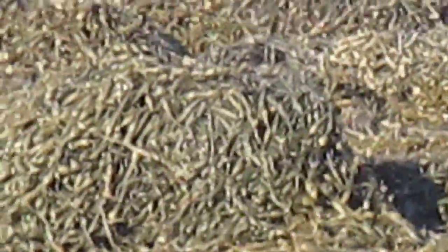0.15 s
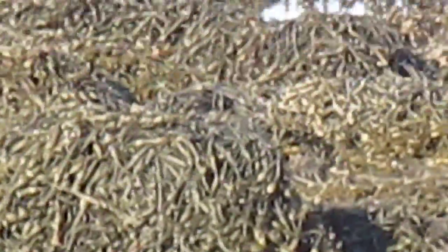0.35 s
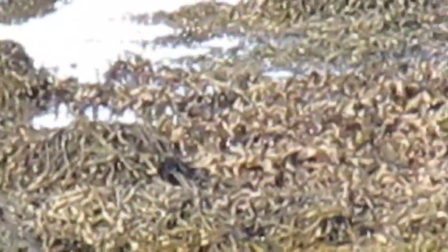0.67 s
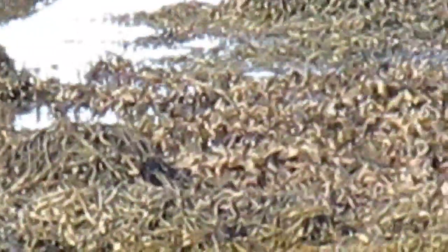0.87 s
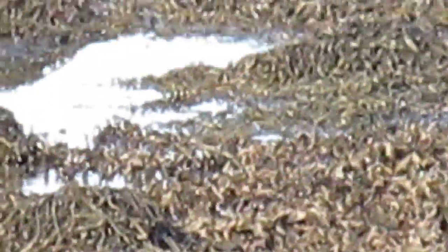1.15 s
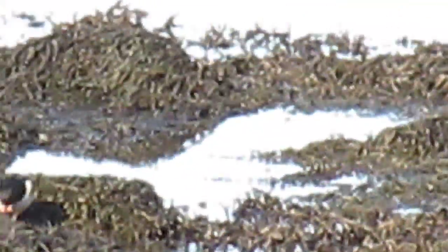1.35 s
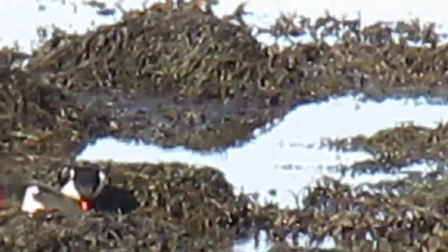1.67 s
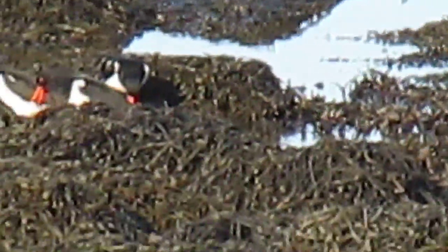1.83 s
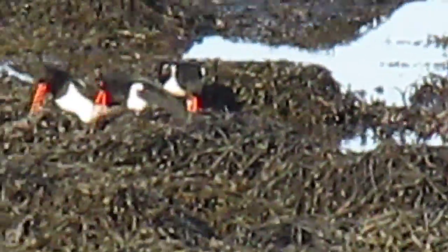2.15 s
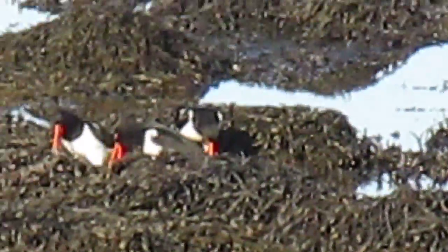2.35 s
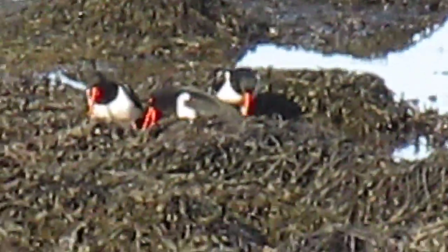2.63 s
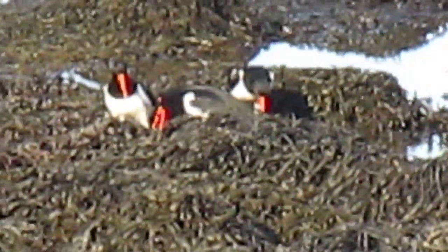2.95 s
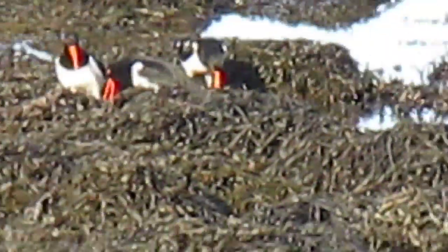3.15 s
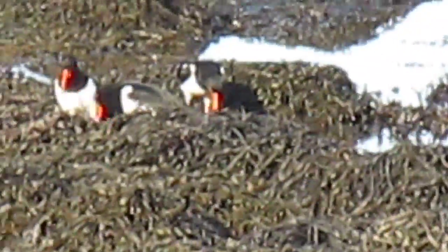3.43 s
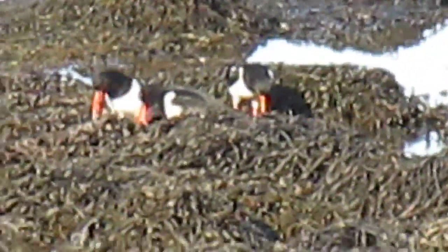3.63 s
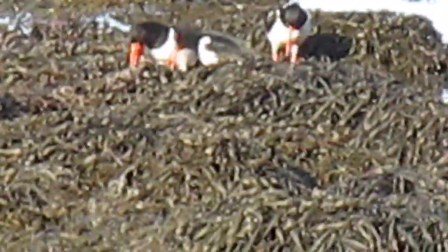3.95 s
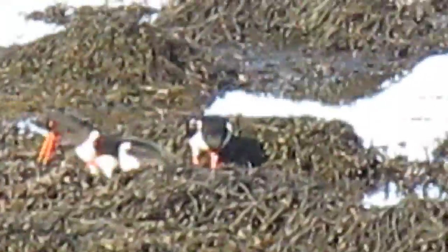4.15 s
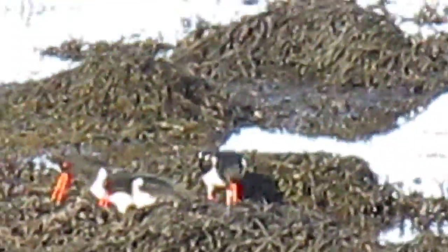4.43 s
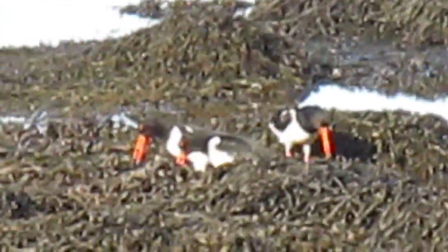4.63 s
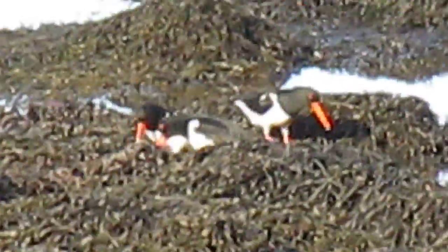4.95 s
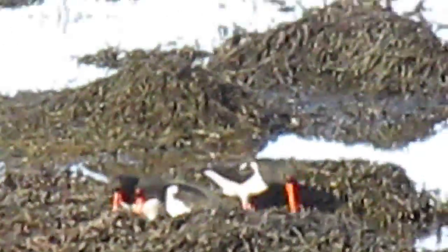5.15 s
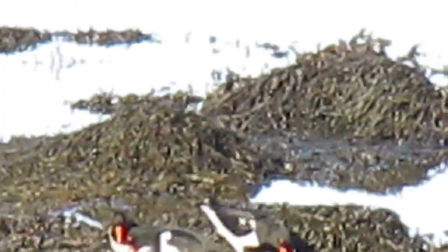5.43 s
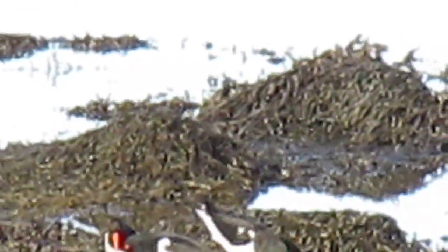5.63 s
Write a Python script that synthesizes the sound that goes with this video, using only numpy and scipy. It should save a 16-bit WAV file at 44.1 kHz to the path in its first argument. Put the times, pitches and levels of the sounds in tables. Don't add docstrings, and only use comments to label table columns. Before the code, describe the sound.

Outdoor handheld stereo pickup on a seaweed-covered shore. Fast, piercing bird whistles tumble over one another, the highest in paired syllables, others lower with slurs and upward flicks. After about four seconds the highest voice drops out for a while and soft deep whistles fill in. Low wind buffeting grows, with dull thumps, clicks of the camera shell and short dry rubbing over a soft distant surf hiss.

```python
import sys
import numpy as np
from scipy import signal
from scipy.fft import rfft, irfft, next_fast_len
from scipy.io import wavfile

SR = 44100
rng = np.random.default_rng(int(sys.argv[2]) if len(sys.argv) > 2 else 0)


def store_wav(level_fs):
    pcm = np.round(np.clip(np.atleast_2d(level_fs), -1, 1) * 32767)
    wavfile.write(sys.argv[1], SR, pcm.T.astype(np.int16))


def voltage_ratio(decibels):
    exponent = np.asarray(decibels, float) / 20
    return 10 ** exponent


N = 255339

# middle in seconds, left level in dB, right level in dB, hold in seconds.
GUSTS = [(.0, -38.5, -33, 0.026), (.28, -45.5, -47, 0.041), (0.484, -32.5, -23.5, 0.021),
         (.72, -50.5, -47, .2), (1.441, -35.5, -27, 0.026), (1.6, -39.5, -32, 0.096),
         (1.79, -30, -24, 0.075), (1.94, -39.5, -35, 0.09), (2.259, -31.5, -36.5, 0.0096),
         (3.08, -43, -35, 0.19), (3.24, -35.5, -32, 0.016), (3.431, -41.5, -34, 0.14),
         (3.68, -36, -26.5, 0.057), (3.88, -34.5, -28.5, 0.024), (4.059, -27.5, -19.5, 0.0049),
         (4.251, -33.5, -26, 0.021), (4.672, -27.5, -19, 0.34), (5.154, -31, -26, 0.039),
         (5.288, -21, -26, 0.025), (5.424, -25.5, -19.5, 0.012), (5.658, -22, -17, 0.023),
         (5.77, -33.5, -26.5, 0.032)]
# frequency in Hz, level in dB.
SURF_SPECTRUM = [(150, 7), (300, 0), (700, -9.5), (1600, -9.5), (2550, -9.5), (3400, -17), (9400, -19.5),
                 (16000, -24)]
# frequency in Hz, likeness from -1 to 1.
SURF_LIKENESS = [(150, -0.19), (600, -0.32), (1500, 0.34), (4000, 0.28), (15000, 0.26)]

# frequency in Hz, gain in dB.
THROAT = [(1200, -5), (2000, -2.5), (2550, 2.5), (3050, 3), (3600, 1.5), (5500, -2.5), (9000, 9),
          (14000, -13.5)]
# time in seconds, then highest, bright, middle and lowest bird in dB.
FACING = [
    (0.0, 0, -1, 4, -1.5),
    (1.2, 8.5, 4.5, 9, 5),
    (2.0, -2, -2.5, 5, 4),
    (3.0, 3.5, 3.5, 4.5, -0.5),
    (3.8, 2, -2.5, 1.5, 0),
    (5.79, 3.8, -5, -14, -7.5),
]
MIDDLE_OVERTONES_DB = [-3, -8, -24, -37, -37]
HIGH_OVERTONES_DB = [1.5, -5, -23.5, -17.5, -22]
SHARP_OVERTONES_DB = [-2.5, 0.5, -9.5, -13.5, -11.5]
LOW_OVERTONES_DB = [4, 4, -8, -18.5, -35, -25]
DEEP_OVERTONES_DB = [1, -1, -6.5, -39, -17]

MIDDLE_NOTES = [(.018, 2190, -55.5, 0.084), (.472, 2270, -56, 0.024), (1.462, 2190, -58, 0.035),
                (2.08, 2286, -54, 0.048), (2.235, 2250, -53, 0.031), (2.38, 2245, -53, 0.038),
                (2.53, 2360, -49, 0.03), (2.672, 2270, -55.5, .034), (4.565, 2050, -50.5, 0.03),
                (4.721, 2000, -51, 0.027), (4.61, 2050, -66, 0.038)]
MIDDLE_RUN = [(2.852, 1984, -54, 0.031), (3.037, 1950, -54, 0.033), (3.237, 2020, -54, .034),
              (3.35, 2000, -52.5, 0.031), (3.473, 2066, -53, 0.033), (3.593, 2000, -56.5, 0.051),
              (3.724, 2044, -55.5, 0.046), (3.855, 2063, -53.5, 0.041), (3.996, 2025, -53, 0.035),
              (4.136, 2000, -53.5, 0.042), (4.277, 1953, -54, 0.039), (4.42, 1940, -50, 0.034)]
MIDDLE_PEAKS = [(.25, 2450, -56.5, 0.024), (.447, 2290, -55, .028), (.577, 2277, -53.5, 0.04),
                (.918, 2420, -52, 0.031), (1.091, 2380, -54, 0.032), (1.259, 2420, -49.5, 0.034),
                (1.41, 2440, -54, .03), (1.578, 2400, -50.5, 0.028)]
HIGH_FIRST = [(.22, 2880, -43.5, 0.038), (.487, 2866, -44.5, 0.041), (.765, 3000, -44.5, 0.047),
              (.934, 3093, -40.5, 0.05), (1.203, 2814, -44, 0.043), (1.435, 2987, -43, 0.056),
              (1.694, 2863, -39.5, 0.048), (1.928, 2823, -37.5, 0.044), (2.105, 2730, -39.5, 0.032),
              (2.14, 2747, -37, 0.033), (2.363, 2776, -39.5, 0.035), (2.576, 2786, -39, 0.041),
              (2.825, 2630, -39.5, .036), (3.075, 2830, -41, 0.046), (3.316, 2755, -39, 0.039),
              (3.594, 2765, -36, 0.043), (3.883, 2697, -40, 0.038), (4.158, 2723, -41, .034),
              (5.659, 2690, -49, .045)]
HIGH_SECOND = [(.098, 3245, -40, 0.1), (.387, 3227, -42.5, 0.07), (.664, 3210, -42.5, 0.077),
               (1.01, 3224, -36, 0.039), (1.261, 3300, -39.5, 0.05), (1.523, 3176, -40.5, 0.049),
               (1.776, 3100, -38, 0.046), (1.985, 3050, -35, 0.043), (2.187, 3060, -37.5, 0.04),
               (2.403, 3043, -38.5, 0.054), (2.642, 2856, -38.5, 0.044), (2.885, 2955, -40.5, 0.053),
               (3.123, 2954, -40, 0.048), (3.38, 2705, -36.5, 0.048), (3.648, 2720, -38, 0.05),
               (2.815, 3150, -51, .022), (3.207, 3030, -56, .02), (3.412, 3100, -55, 0.019),
               (.632, 3180, -56, 0.016), (5.009, 2656, -42, 0.048), (5.26, 2895, -43.5, 0.041),
               (5.458, 2675, -43, 0.037), (5.706, 2670, -49, .055)]
SHARP_PIPS = [(.114, 2490, -57, 0.045), (.321, 2615, -50, 0.042), (.603, 2538, -48.5, 0.027),
              (.718, 2487, -47.5, 0.019), (.802, 2580, -45.5, 0.0087), (.966, 2580, -48, 0.041),
              (1.299, 2550, -47.5, 0.026), (1.441, 2550, -44, 0.027), (2.682, 2430, -48.5, 0.028),
              (2.855, 2485, -46.5, 0.038), (3.43, 2424, -45.5, 0.031), (4.43, 2427, -44, 0.03),
              (5.2, 2250, -50, 0.023), (5.635, 2350, -50.5, .024)]
SHARP_ARCHES = [(1.127, 2630, -45.5, 0.038), (1.624, 2517, -43.5, 0.031), (1.778, 2510, -45, 0.026),
                (3.051, 2403, -46, 0.043), (3.247, 2472, -42, 0.03), (3.83, 2570, -54, 0.022),
                (3.951, 2557, -40.5, 0.047), (4.532, 2365, -49.5, .045), (4.688, 2326, -45.5, 0.033),
                (4.779, 2293, -48.5, 0.037), (4.244, 2440, -47.5, 0.057), (4.964, 2586, -42, 0.038),
                (5.234, 2490, -44, 0.041), (5.43, 2424, -41, 0.033)]
LOW_SLURS = [
    (.267, 2174, -56, .128),
    (.503, 1966, -52, 0.1),
    (4.998, 1755, -50, 0.049),
]
LOW_TRILL = [(.15, 1820, -59, 0.018), (.632, 1490, -53, .025), (.76, 1963, -49, 0.051),
             (.968, 1730, -47, 0.014), (1.207, 1897, -50.5, 0.042), (1.423, 1951, -48, 0.022),
             (2.772, 1780, -47, 0.014), (2.959, 1795, -50, 0.021), (3.139, 1826, -43.5, 0.011),
             (4.875, 1763, -53.5, 0.033), (5.136, 1813, -52.5, 0.031), (5.253, 1900, -63, 0.026),
             (5.284, 1900, -48.5, 0.03), (5.45, 1760, -44.5, .025), (5.751, 1980, -50.5, 0.029)]
LOW_FLICKS = [(1.045, 1679, -45, 0.032), (1.586, 1748, -48, 0.027), (1.728, 1757, -46, 0.034),
              (1.878, 1768, -47.5, 0.039), (2.045, 1794, -46, 0.03), (2.209, 1790, -47, 0.021),
              (2.349, 1728, -42.5, 0.02), (2.496, 1684, -45.5, 0.026), (2.642, 1720, -45, 0.032)]
FAR_NOTES = [(3.593, 1550, -52, .04), (3.745, 1586, -57.5, 0.031), (4.12, 1710, -55.5, .03),
             (4.378, 1555, -56, .03), (4.508, 1420, -59, 0.027), (4.534, 1520, -56, .03),
             (4.662, 1595, -60, 0.036), (4.695, 1446, -53, 0.027), (4.783, 1486, -57.5, .025),
             (4.85, 1440, -52.5, 0.024), (4.912, 1500, -63, 0.018), (5.113, 1405, -54, 0.022),
             (5.19, 1540, -70, 0.027), (5.345, 1560, -66, 0.037), (5.402, 1520, -50.5, 0.032),
             (5.472, 1510, -58, 0.027), (5.566, 1342, -53.5, .035), (5.612, 1550, -51, 0.028),
             (5.697, 1470, -56, 0.016), (5.717, 1473, -53.5, 0.036), (5.79, 1520, -60, 0.019)]

# time in seconds, peak in dB, brightness in dB.
TICKS = [(0.04, -44, -10), (0.301, -41, -11), (0.685, -38, 9), (0.838, -42, -7), (1.162, -36.5, 5),
         (1.217, -35.5, -15), (1.321, -36.5, -5), (1.908, -38, 26), (4.05, -34, -3), (4.206, -30, 23.5),
         (4.357, -28, 23), (4.408, -32, 32), (5.388, -30.5, -4), (5.423, -25.5, 13), (5.436, -28.5, 8),
         (5.563, -32, -25)]
# frequency in Hz, level in dB, 60 dB decay in seconds.
SHELL_MODES = [(990, 7.5, 0.035), (1320, 20, 0.0049), (2000, 5.5, 0.0094), (3000, 4.5, 0.0062),
               (3665, -6.5, 0.014), (5900, -16, 0.0098)]
# frequency in Hz, level difference in dB.
PORT_BALANCE = [(300, 0), (1290, -1.5), (2380, -5), (4400, -3), (8120, 4.5), (15000, -3)]
# frequency in Hz, phase in radians.
PORT_PHASE = [(1000, 0.093), (2330, 1.1), (3450, -0.015), (5080, 1.61), (7060, 0.47), (7670, -1.16),
              (10200, -0.23), (16000, 0.31)]
# time in seconds, peak in dB.
THUMPS = [
    (0.475, -32),
    (1.779, -30),
    (3.662, -25),
    (4.046, -27),
    (4.638, -19.5),
    (4.861, -21.5),
]
# time in seconds, level in dB.
HUM = [
    (1.85, -85),
    (1.95, -62.5),
    (2.3, -71),
    (2.45, -61),
    (2.65, -66),
    (2.9, -75),
]
# time in seconds, level in dB.
RUSTLE = [
    (2.45, -92),
    (2.55, -57),
    (2.66, -63),
    (2.74, -93),
]
# time in seconds, level in dB.
RUB = [
    (5.37, -96),
    (5.385, -46.5),
    (5.41, -59.5),
    (5.44, -68),
    (5.54, -87),
    (5.57, -54),
    (5.62, -44),
    (5.64, -99),
]

# climb in seconds, climb gained per second of length,
# share of pitch lost in the fall, more lost per second of fall.
MIDDLE_SHAPE, RUN_SHAPE = (.002, .45, .15, 5.5), (.002, .6, .12, 5.5)
SCOOP_SHAPE, PEAK_SHAPE = (.002, .8, .037, 3.6), (.002, .45, .146, 8.2)
FIRST_SHAPE, SECOND_SHAPE = (.002, .21, .064, 7.5), (.006, .27, .138, 2.9)
PIP_SHAPE, ARCH_SHAPE = (.002, .079, .044, 2.2), (.0046, .31, .109, 3.2)
SLUR_SHAPE, TRILL_SHAPE = (.006, .03, .26, .3), (.0058, .31, .049, 5.76)
FLICK_SHAPE, FAR_SHAPE = (.006, .23, .094, .3), (.003, .63, .03, 3.4)


def rms_one(x):
    return x / np.sqrt(np.mean(x ** 2) + 1e-20)


def in_time(rows):
    s, *columns = np.transpose(rows)
    return [np.interp(np.arange(N) / SR, s, c) for c in columns]


def at_hz(points, hz):
    point_hz, value = np.transpose(points)
    return np.interp(np.log(hz + 1), np.log(point_hz), value)


def band(x, low_hz, high_hz, order=2):
    edges = [low_hz, min(high_hz, .49 * SR)]
    return signal.sosfilt(signal.butter(order, edges, "band", fs=SR, output="sos"), x)


def drift(rate_hz):
    r = np.exp(-2 * np.pi * rate_hz / SR)
    wander = signal.lfilter([1], [1, -2 * r, r * r], rng.standard_normal(N + SR))
    return rms_one(wander[SR:])


def gusts():
    rise_db_per_s, fall_db_per_s = 197, 151
    t = np.arange(0, N / SR + .01, .002)
    s, left_db, right_db, held = np.transpose(GUSTS)[:, :, None]
    before = np.maximum(s - held / 2 - t, 0)
    after = np.maximum(t - s - held / 2, 0)
    below_db = rise_db_per_s * before + fall_db_per_s * after
    levels = []
    for db, lull_db in [(left_db, -55), (right_db, -49)]:
        power = voltage_ratio(2 * (db - below_db)).sum(axis=0) + voltage_ratio(2 * lull_db)
        levels.append(10 * np.log10(power))
    return in_time(np.column_stack([t, *levels]))


def wind():
    opposed = 0.77
    left_db, right_db = gusts()
    upper_db = -15.5 + 1.33 * (np.maximum(left_db, right_db) + 31.0) + 5.7 * drift(9.3)
    white = rng.standard_normal((2, 2, N)) * voltage_ratio(2.0 * drift(28.5))
    lower = rms_one(band(band(white[0], 27.3, 75.8), 4.8, 214.0))
    upper = rms_one(band(band(white[1], 41.0, 120.0), 45.0, 284.0, order=3))
    push, own = (lower + voltage_ratio(upper_db) * upper) / np.sqrt(1 + voltage_ratio(2 * upper_db))
    left = np.sqrt(1 - opposed ** 2) * own - opposed * push
    return np.array([voltage_ratio(left_db) * left, voltage_ratio(right_db) * push])


def surf():
    hz = np.arange(N // 2 + 1) * SR / N
    mid, side = rfft(rng.standard_normal((2, N))) * voltage_ratio(at_hz(SURF_SPECTRUM, hz))
    alike = at_hz(SURF_LIKENESS, hz)
    both = np.sqrt(1 + alike) * mid + np.sqrt(1 - alike) * side * [[1], [-1]]
    return voltage_ratio(-53.5 + .5 * drift(0.16)) * rms_one(irfft(both, N))


def whine():
    return voltage_ratio(-98) * np.sin(2 * np.pi * 15734 * np.arange(N) / SR)


def arches(notes, shape, power=2, flick=0):
    top_s, top_hz, db, length = np.transpose(notes)
    climb_s = np.clip(shape[0] + shape[1] * length, .003, length - .004)
    fall_s = length - climb_s
    loss = shape[2] + shape[3] * fall_s
    return [(*row, power, flick) for row in zip(top_s, top_hz, db, climb_s, fall_s, loss)]


def pipe(notes, overtones_db, facing_db, climb, edge, sag_db, rise_sag_db):
    flutter_db, waver = 3.0, 0.0045
    bill_hz, bill_width_hz, bill_db = 2532, 166, 3.5
    out = np.zeros(N)
    order = np.arange(1, len(overtones_db) + 1)[:, None]
    overtones_db = np.array(overtones_db)
    flutter, wobble = drift(62.0), drift(98.0)
    for top_s, top_hz, db, climb_s, fall_s, loss, power, flick in notes:
        start = round((top_s - climb_s - edge / 2) * SR)
        stop = max(round((top_s + fall_s + edge / 2) * SR), start + 9)
        at = np.arange(max(start, 0), min(stop, N))
        t = at / SR - top_s
        rising = t < 0
        away = np.where(rising, -t / climb_s, t / fall_s) ** power
        away = np.minimum(away, np.sqrt(np.pi / 2))
        bend = flick * (t > 0) * away ** 3 - np.where(rising, climb, loss) * away
        hz = top_hz * (1 + bend + waver * wobble[at])
        gate = np.clip(np.minimum(at - start, at[-1] - at) / SR / edge, 0, 1)
        sag = np.where(rising, rise_sag_db, sag_db) * away * np.sqrt(order)
        partial_db = overtones_db[:, None] + facing_db[at] * np.log2(order) - sag
        partial_db = partial_db + at_hz(THROAT, order * hz)
        partial_db = partial_db + bill_db * np.exp(-((order * hz - bill_hz) / bill_width_hz) ** 2)
        partial_db = partial_db + flutter_db * flutter[(at + order * (N // 7)) % N]
        strongest_db = np.max(overtones_db + at_hz(THROAT, order[:, 0] * top_hz))
        partials = np.sin(order * 2 * np.pi * np.cumsum(hz) / SR) * (order * hz < 16000)
        tone = (voltage_ratio(partial_db - strongest_db) * partials).sum(axis=0)
        out[at] += voltage_ratio(db) * np.sin(np.pi / 2 * gate) ** 2 * tone
    return out


def middle_bird():
    notes = arches(MIDDLE_NOTES, MIDDLE_SHAPE)
    notes += arches(MIDDLE_RUN[:5], SCOOP_SHAPE, power=1.3)
    notes += arches(MIDDLE_RUN[5:], RUN_SHAPE)
    notes += arches(MIDDLE_PEAKS, PEAK_SHAPE, power=1.3)
    return pipe(notes, MIDDLE_OVERTONES_DB, in_time(FACING)[2],
                climb=0.39, edge=0.00484, sag_db=0.2, rise_sag_db=-1.5)


def rocks(x):
    near_t60_s, shore_t60_s = 0.073, 0.33
    t = np.arange(SR // 3) / SR
    echoes = rng.standard_normal((2, len(t))) * voltage_ratio(6.3 * rng.standard_normal((2, len(t))))
    near = band(echoes * voltage_ratio(-60 * t / near_t60_s) * (t > .003), 910, 4400, order=1)
    haze = np.tanh(echoes[::-1]) * voltage_ratio(-60 * t / shore_t60_s) * (t > .02)
    shore = band(haze, 1900, 3150, order=1)
    both = (voltage_ratio(-9.5) * rms_one(near) + voltage_ratio(-18) * rms_one(shore)) / np.sqrt(len(t))
    return signal.fftconvolve(x[None], both, axes=1)[:, :N]


def ports(x):
    size = next_fast_len(N + 4096)
    hz = np.arange(size // 2 + 1) * SR / size
    half = voltage_ratio(at_hz(PORT_BALANCE, hz) / 2) * np.exp(.5j * at_hz(PORT_PHASE, hz))
    return irfft(rfft(x, size) * [half, 1 / half], size)[:, :N]


def shell_ticks():
    s, db, bright_db = np.transpose(TICKS)
    at = np.round(s * SR).astype(int)
    out = np.zeros((2, N))
    scatter = rng.normal(0, 2.5, (len(at), len(SHELL_MODES)))
    for (hz, mode_db, t60), own_db in zip(SHELL_MODES, scatter.T):
        high = np.clip(np.log2(hz / 1000) / 2, 0, 1)
        strike = np.full((2, N), 1e-18)
        strike[1, at] = voltage_ratio(db + mode_db + high * bright_db + own_db - 14.5)
        strike[0, at] = strike[1, at] * voltage_ratio(-12.0 * (7.5 - 0.82 * high))
        r, w = voltage_ratio(-60 / (t60 * SR)), 2 * np.pi * hz / SR
        out += signal.lfilter([0, np.sin(w)], [1, -2 * r * np.cos(w), r * r], strike)
    return out


def high_bird():
    pairs = arches(HIGH_FIRST, FIRST_SHAPE) + arches(HIGH_SECOND, SECOND_SHAPE)
    return pipe(pairs, HIGH_OVERTONES_DB, in_time(FACING)[0],
                climb=0.19, edge=.003, sag_db=6.5, rise_sag_db=4.0)


def bright_bird():
    notes = arches(SHARP_PIPS, PIP_SHAPE) + arches(SHARP_ARCHES, ARCH_SHAPE)
    return pipe(notes, SHARP_OVERTONES_DB, in_time(FACING)[1],
                climb=0.2024, edge=0.00401, sag_db=8.5, rise_sag_db=11.0)


def low_bird():
    notes = arches(LOW_SLURS[:1], SLUR_SHAPE, power=1.3)
    notes += arches(LOW_SLURS[1:], SLUR_SHAPE, power=3.5)
    notes += arches(LOW_TRILL, TRILL_SHAPE)
    notes += arches(LOW_FLICKS, FLICK_SHAPE, flick=0.22)
    return pipe(notes, LOW_OVERTONES_DB, in_time(FACING)[3],
                climb=0.29, edge=0.0073, sag_db=-1.9, rise_sag_db=1.5)


def thumps():
    burst_s, burst_hz = 0.0058, 148.3
    s, db = np.transpose(THUMPS)[:, :, None]
    t = np.arange(N) / SR - s - burst_s
    burst = voltage_ratio(db) * np.exp(-(t / burst_s) ** 2) * np.sin(2 * np.pi * burst_hz * t)
    return burst.sum(axis=0) * [[-.45], [1.9]]


def motor_hum():
    step_s, first_step_s, step_share = .0795, 1.97, .22
    turn = ((np.arange(N) / SR - first_step_s) / step_s + .5) % 1 - .5
    steps = np.exp(-(turn / step_share) ** 2) * voltage_ratio(1.8 * drift(9.2))
    hum_hz = 454 * (1 + 0.01516 * drift(8.4))
    phase = 2 * np.pi * np.cumsum(hum_hz) / SR
    tone = np.sin(phase) + voltage_ratio(-5.0) * np.sin(phase / 2)
    return 2 * voltage_ratio(in_time(HUM)[0]) * steps * tone


def strap_rustle():
    brush = rms_one(band(rng.standard_normal(N), 180, 500))
    return brush * voltage_ratio(in_time(RUSTLE)[0] + 3.1 * drift(36.0)) * [[.6], [1.3]]


def far_bird():
    deep = pipe(arches(FAR_NOTES, FAR_SHAPE), DEEP_OVERTONES_DB, np.zeros(N),
                climb=0.23, edge=.008, sag_db=1.0, rise_sag_db=-1.5)
    return ports(deep + voltage_ratio(-1.0) * rocks(deep))


def finger_rub():
    grains = rng.standard_normal((2, N)) * voltage_ratio(3.0 * drift(390))
    touching = np.arange(N) > RUB[0][0] * SR
    return voltage_ratio(in_time(RUB)[0]) * touching * rms_one(band(grains, 990, 13000, order=1))


def scene():
    birds = middle_bird() + high_bird() + bright_bird() + low_bird()
    shore = ports(birds + rocks(birds) + surf()) + far_bird()
    air = wind() + thumps()
    handling = shell_ticks() + strap_rustle() + finger_rub()
    return shore + air + handling + motor_hum() + whine()


def band_limit(x):
    return signal.sosfilt(signal.butter(12, 16460, fs=SR, output="sos"), x)


def record(dry):
    low_pass = signal.cheby2(12, 60, 16250, fs=SR, output="sos")
    mix = signal.sosfilt(low_pass, dry)
    return band_limit(mix)


dry = scene()
out = record(dry)
store_wav(out)
```